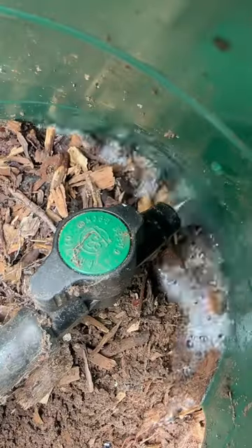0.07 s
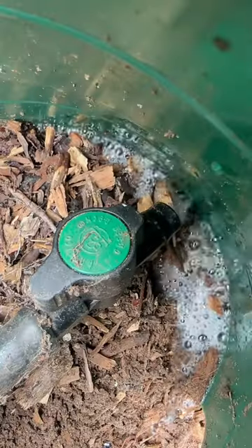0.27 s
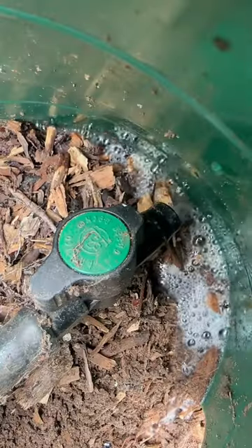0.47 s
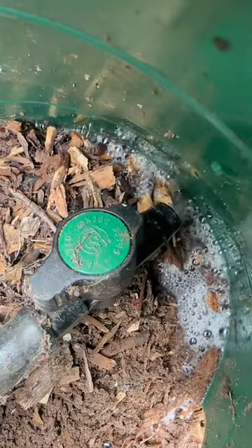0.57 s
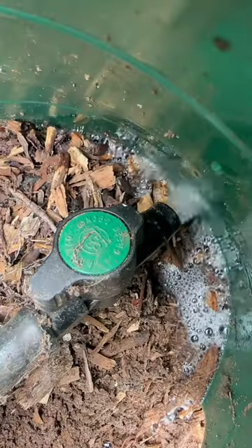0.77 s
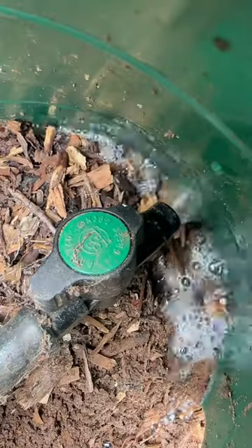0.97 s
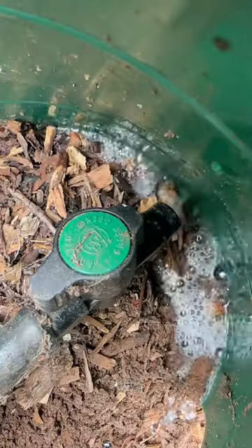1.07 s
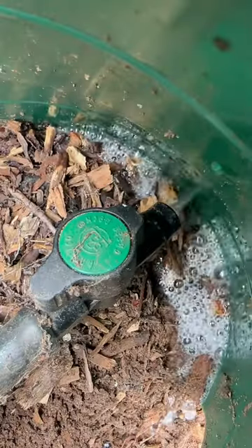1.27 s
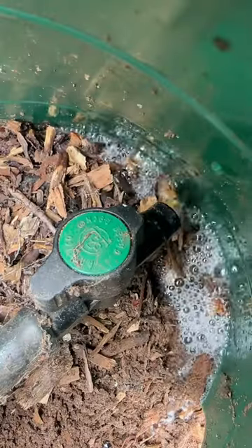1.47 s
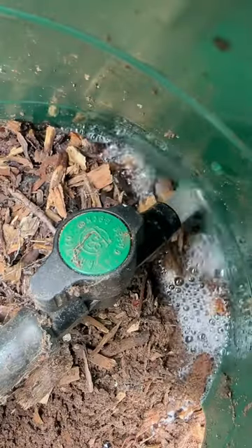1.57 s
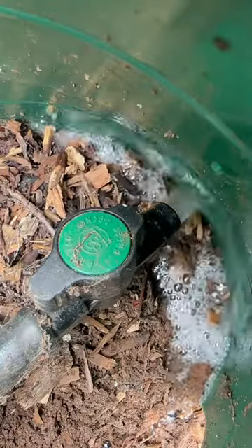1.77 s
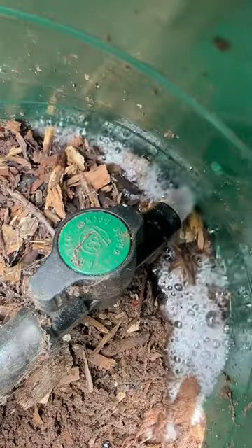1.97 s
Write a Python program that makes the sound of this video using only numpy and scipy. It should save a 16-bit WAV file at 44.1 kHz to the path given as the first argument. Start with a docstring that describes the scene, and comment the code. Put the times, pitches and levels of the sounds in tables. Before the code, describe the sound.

Soapy water gurgles out of a drain pipe into a plastic basin of mulch. Irregular surges bring hollow glugs, wet slaps and bursts of pattering spray, with softer bubbling between them, close to the microphone and slightly left.

```python
"""Drain pipe into a mulch basin

Soapy water surges from a drain pipe into a plastic basin of mulch, close to a stereo microphone pair.
Foam fizzes faintly, spray hisses and patters, and churning water sets the air in the pipe humming.
In front, slugs of water slap out and large air pockets glug, most of them rising in pitch."""
import sys
import numpy as np
from scipy import signal
from scipy.fft import rfft, irfft
from scipy.io import wavfile
from scipy.ndimage import uniform_filter1d, minimum_filter1d

SR = 44100
rng = np.random.default_rng(int(sys.argv[2]) if len(sys.argv) > 2 else 0)


def file_out(sig):
    """Save sig as 16-bit WAV at sys.argv[1]."""
    # one column per channel
    cols = np.atleast_2d(sig).T
    # limit, then scale
    lim = np.clip(cols, -1, 1)
    pcm = np.round(lim * 32767).astype(np.int16)
    wavfile.write(sys.argv[1], SR, pcm)


N = 89390

# Spectrum of the foam's fizz: f/Hz, relative level/dB
FOAM_SPECTRUM = [(590, -42), (1000, -12), (1500, -23), (8480, -13), (11200, -25), (13700, -4), (16300, -29)]
# Surges of spray: t/s, level/dB
SPRAY_LEVELS = [(0, -30.5), (.07, -45.5), (.135, -44.5), (.15, -60.5), (.53, -58), (.71, -48.5),
                (.73, -36.5), (.83, -30.5), (.875, -32.5), (.91, -45.5), (1.0, -46), (1.02, -59.5),
                (1.27, -57.5), (1.35, -44.5), (1.5, -49), (1.54, -37.5), (1.63, -35.5), (1.73, -40),
                (1.84, -45.5), (1.9, -56.5), (1.95, -62), (2.03, -52.5)]
# Spectrum of the spray: f/Hz, relative level/dB
SPRAY_SPECTRUM = [(350, -32), (600, -25.5), (896, -3), (1340, -11.5), (1890, -5.5), (2860, -15),
                  (8510, -9.5), (11500, -16.5), (14200, -15), (16300, -7)]
# Modes of the air in the pipe, low to high: f/Hz, nominal width/Hz, relative level/dB
PIPE_MODES = [(211, 54.6, 1.5), (278.6, 19, -7.5), (411.7, 43, 0.5), (684, 31.5, -12), (1030, 310, 6.5),
              (1510, 49, 8), (1813, 85, -3.5), (2255, 41, -6), (3020, 50, -3.5), (3507, 65, 1),
              (4107, 140, 3)]
# Surges in the pipe: t/s, hum level/dB, rumble level/dB, level of the sputter at the mouth/dB
CHURN_LEVELS = [(0, -17.5, -23, -43), (.03, -28, -38, -42), (.1, -37, -37.5, -67), (.2, -28, -26, -60),
                (.46, -39, -40.5, -62.5), (.6, -32.5, -50, -59), (.635, -19, -21, -64),
                (.72, -27, -61, -41), (.79, -33.5, -69, -68), (.86, -20, -30, -29.5),
                (.93, -29.5, -33, -98), (1.08, -31.5, -37.5, -48), (1.19, -48, -41, -59.5),
                (1.3, -34.5, -43.5, -52.5), (1.37, -23, -19.5, -42), (1.45, -25.5, -52, -54),
                (1.62, -33, -40.5, -47), (1.84, -43, -41, -65), (1.9, -31.5, -28.5, -51),
                (2.03, -33.5, -29, -93)]
# Spectrum of the rumble: f/Hz, relative level/dB
RUMBLE_SPECTRUM = [(25, -24), (54, 12), (113, 1.5), (160, 6), (210, -22.5)]
# Slugs and drops striking: t/s, relative crack level/dB, relative thump level/dB, crack t60/s, crack f/Hz
STRIKES = [(0.0357, -14, -17, 0.013, 3060), (.068, -24, -27.5, 0.036, 3270),
           (0.0771, -13, -23.5, 0.024, 3460), (0.087, -18.5, -22.5, 0.06, 2800),
           (0.119, -24, -61.5, 0.02, 4220), (0.17, -21, -22, 0.022, 4700), (0.25, -35, -34, 0.046, 3540),
           (0.4412, -38, -51, 0.022, 3480), (0.4908, -63, -40, 0.052, 1520),
           (0.5402, -35, -25, 0.073, 4170), (0.6206, -27, -24, 0.04, 1600),
           (0.629, -21.5, -36, 0.026, 4100), (0.6469, -42, -23.5, 0.038, 4100),
           (0.699, -16, -40, 0.014, 8700), (0.7209, -24, -29.5, 0.064, 8400), (0.78, -18, -28, 0.03, 9050),
           (0.799, -15, -33, 0.034, 6660), (0.838, -12.5, -15.5, 0.049, 5700),
           (0.8713, -12.5, -22.5, 0.023, 5110), (0.8941, -11.5, -27, 0.019, 8500),
           (0.9152, -23, -67, 0.013, 4340), (0.953, -21, -21, 0.05, 2280), (0.9863, -26, -23, 0.019, 6660),
           (1.0305, -19, -21, 0.016, 4450), (1.2269, -61, -40, 0.06, 3540), (1.2903, -32, -36, 0.044, 3950),
           (1.351, -26, -27, 0.034, 4140), (1.3755, -24, -18.5, 0.043, 4100),
           (1.3857, -32, -23.5, 0.032, 4000), (1.393, -36, -20, 0.022, 4040),
           (1.4192, -32, -15.5, 0.016, 4130), (1.4763, -24, -27.5, 0.035, 4270),
           (1.515, -23.5, -28.5, 0.018, 8270), (1.5311, -18.5, -60, 0.023, 5000),
           (1.5686, -13, -64, 0.015, 6100), (1.6025, -17, -27, 0.023, 1810),
           (1.6451, -19, -30, 0.028, 6860), (1.676, -13.5, -52, 0.015, 7100),
           (1.7172, -15.5, -38.5, 0.023, 7940), (1.8613, -23, -74, 0.07, 2300),
           (1.9196, -9, -14.5, 0.018, 4400), (1.9849, -31, -37, 0.025, 3850),
           (2.0208, -9.5, -16.5, 0.01, 2620)]
# Spectrum of a strike's crack: f/Hz, relative level/dB
CRACK_SPECTRUM = [(880, -58), (1500, -4.5), (3140, -6.5), (4150, -12.5), (7560, -10), (8520, -6),
                  (11200, -18), (13600, -7), (16300, -17.5)]
# Spectrum of a strike's thump: f/Hz, relative level/dB
THUMP_SPECTRUM = [(100, 15.5), (400, 21.5), (900, 2.5), (1800, -4), (3000, -18), (4200, -10.5), (5200, -56)]
# Large air pockets: t/s, length/s, start f/Hz, end f/Hz, peak level before wobble/dB
AIR_POCKETS = [(.002, 0.013, 341, 364, -8), (0.009, 0.052, 367, 440, -22), (0.068, 0.047, 1775, 1834, -30),
               (0.093, 0.006, 1270, 1350, -34), (0.083, 0.029, 211, 305, -17),
               (0.171, 0.094, 404, 409, -20.5), (.185, 0.0097, 157, 203, -13),
               (0.226, 0.053, 393.5, 427, -23.5), (0.228, 0.025, 628, 677, -26),
               (0.286, 0.062, 440, 474, -26), (0.305, 0.03, 570, 703, -32), (0.371, .07, 192, 266, -30),
               (.443, 0.017, 650, 687, -31), (0.451, 0.037, 181, 194, -28), (0.458, 0.1, 404, 490, -31),
               (.492, 0.026, 230, 199, -20.5), (0.546, 0.068, 419, 410, -23.5),
               (0.547, 0.071, 225, 241, -16.5), (.619, 0.043, 297, 525, -13.5),
               (.62, 0.026, 1560, 1600, -31), (0.641, 0.047, 376, 440, -10),
               (0.648, 0.021, 4000, 4150, -42.5), (0.652, 0.043, 1380, 1820, -41),
               (0.674, 0.023, 485, 488, -8), (0.678, 0.032, 768, 1123, -23.5),
               (0.681, 0.014, 1790, 1910, -28), (0.688, 0.015, 346, 490, -3),
               (0.712, 0.017, 830, 1100, -25.5), (0.727, 0.0081, 324, 332, -8),
               (0.737, 0.013, 228, 288, -13.5), (.841, 0.037, 324, 409, -15), (.842, 0.013, 208, 322, -6.5),
               (.8415, 0.0035, 770, 1080, -14), (.843, 0.005, 1780, 1860, -19.5),
               (0.853, 0.0065, 806, 1200, -16.5), (0.867, 0.02, 231, 305, -14.5),
               (.872, 0.007, 1800, 1880, -24.5), (.895, 0.0089, 479, 470, -19),
               (0.952, 0.089, 634, 637, -30.5), (.955, 0.0097, 424, 436, -16.5),
               (0.999, 0.1, 435, 434.4, -26.5), (1.029, 0.027, 1390, 1496, -41),
               (1.14, 0.091, 690, 710, -43), (1.228, 0.015, 502, 510, -26), (1.286, 0.04, 678, 790, -35),
               (1.296, 0.08, 352.6, 416, -30), (1.347, 0.0099, 283, 540, -6.5),
               (1.346, 0.0089, 825, 1080, -27.5), (1.359, 0.0079, 755, 1070, -31),
               (1.362, 0.0085, 239, 380, -7.5), (1.375, 0.047, 1430, 1576, -30),
               (1.387, 0.017, 2280, 2330, -36), (1.374, 0.042, 315, 363, -8.5),
               (1.388, 0.0087, 449, 586, -7), (1.389, 0.053, 227, 266, -11.5), (1.396, 0.048, 365, 385, -8),
               (1.418, 0.039, 430, 450, -8), (1.419, 0.017, 1770, 1920, -26.5),
               (1.42, 0.027, 1130, 1620, -23), (1.447, 0.037, 1320, 1090, -33),
               (1.489, 0.0077, 300, 358, -13.5), (1.503, 0.015, 400, 446, -20),
               (1.618, 0.048, 379, 386, -27.5), (1.803, 0.018, 390, 361, -24),
               (1.888, 0.035, 286, 347, -18.5), (1.918, 0.03, 369, 386, -15.5),
               (1.926, 0.0099, 1210, 1280, -26.5), (1.979, 0.013, 124, 138, -21)]
# Likeness of the splash at the two microphones: f/Hz, correlation
MIC_LIKENESS = [(500, .985), (1400, .88), (2800, .7), (5600, .68), (16000, .8)]
# Left microphone over right: f/Hz, level/dB
LEFT_LEVEL = [(60, 0.5), (380, 1), (700, 8), (1290, 4), (2380, 7), (4400, 7.5), (8120, 3), (15000, -3.5)]
# Left microphone ahead of right: f/Hz, phase/rad
LEFT_PHASE = [(0, 0), (690, 0.43), (1550, -1), (2330, 1.2), (2840, 1.5), (3880, 0.53), (5340, 1.35),
              (7490, 1.5), (8870, 0), (10200, -3.5), (12200, -17.5), (13700, -4.5), (16200, -6.5)]

FOAM_DB, HISS_FLICKER_DB = -73.5, 3.5
DROPS_PER_S, DROP_SPREAD_DB, DROP_SHARE = 3000, 4.2, .45
PLOPS_PER_S, PLOP_SPREAD_DB, TURBULENCE = 230, 6, 0.86
CRACK_RISE_S, CRACK_CREST_DB, CRACK_PEAK_DB, CRACK_PEAK_OCT = 0.0014, 8, 10, 0.32
THUMP_RISE_S, THUMP_LIFT_DB, THUMP_STRETCH, PIPE_RING_DB = 0.00056, 5.5, 1.79, -16
GLUG_RISE_S, GLUG_WOBBLE_DB, JITTER_TURNS_PER_KHZ = .0008, 3.0, .06
GLUG_SKEW = 0.48  # below 1 the swell peaks early
BASS_CUT_HZ, TREBLE_CUT_HZ, CEILING = 58, 16000, .9


def gain_of(db):
    return 10 ** (np.asarray(db) / 20)


def unit_rms(x):
    return x / np.sqrt(np.mean(x ** 2) + 1e-20)


def at_hz(table, hz):
    f, value = np.transpose(table)
    return np.interp(np.log(hz + 1), np.log(f + 1), value)


def envelope(table, column):
    """One dB column of a table as gain per sample."""
    rows = np.array(table)
    return gain_of(np.interp(np.arange(N) / SR, rows[:, 0], rows[:, column]))


def add(mix, start_s, sound):
    part = mix[round(start_s * SR):][:len(sound)]
    part += sound[:len(part)]


def colour(x, spectrum):
    """Filters by a spectrum, rolling off past its ends; rms 1."""
    hz = np.fft.rfftfreq(len(x), 1 / SR)
    band = np.clip(hz / spectrum[0][0], 0, 1) ** 4 * np.clip(spectrum[-1][0] / (hz + 1), 0, 1) ** 4
    return unit_rms(irfft(rfft(x) * gain_of(at_hz(spectrum, hz)) * band, len(x)))


def ring(x, hz, width):
    """One resonance of peak gain 1."""
    return signal.lfilter(*signal.iirpeak(hz, hz / width, SR), x)


def clicks(per_s, spread_db):
    """Sparse impulses of random sign, a few large."""
    size = gain_of(spread_db * np.minimum(rng.exponential(1, N), 4)) * rng.choice([-1., 1.], N)
    return size * (rng.random(N) < per_s / SR)


def flutter(first, second):
    """Noise smoothed over two spans of samples; rms 1."""
    return unit_rms(uniform_filter1d(uniform_filter1d(rng.standard_normal(N), first), second))


def foam():
    """Soap foam fizzes softly and steadily behind everything."""
    return gain_of(FOAM_DB) * colour(rng.standard_normal(N), FOAM_SPECTRUM)


def spray():
    """Droplets patter as short rising grains of many pitches over a flickering hiss."""
    t, drops = np.arange(300) / SR, np.zeros(N)
    pitches = np.geomspace(900, 15000, num=24)
    for hz in pitches:
        grain = np.sin(2 * np.pi * hz * t * (1 + 40 * t)) * np.exp(-t * hz / 2.6)
        hits = clicks(DROPS_PER_S / len(pitches), DROP_SPREAD_DB)
        drops += signal.oaconvolve(hits, grain * np.sqrt(hz))[:N]
    treble_lift = np.sqrt(np.clip(np.fft.rfftfreq(N, 1 / SR) / 900, 1, 17))
    drops = unit_rms(irfft(rfft(drops) * treble_lift, N))
    flicker = gain_of(HISS_FLICKER_DB * flutter(300, 200))
    hiss = unit_rms(flicker * rng.standard_normal(N))
    mix = DROP_SHARE * drops + (1 - DROP_SHARE) * hiss
    return envelope(SPRAY_LEVELS, column=1) * colour(mix, SPRAY_SPECTRUM)


def pipe(drive, modes):
    """The air column rings at its modes."""
    return unit_rms(sum(gain_of(db) * np.sqrt(50 / width) * ring(ring(drive, hz, 2 * width), hz, 2 * width)
                        for hz, width, db in modes))


def churn():
    """Small plops and turbulence ring the air in the pipe; a lumpy rumble lies below."""
    plops = unit_rms(clicks(PLOPS_PER_S, PLOP_SPREAD_DB))
    drive = plops + TURBULENCE * rng.standard_normal(N)
    hum = envelope(CHURN_LEVELS, column=1) * pipe(drive, PIPE_MODES[:4])
    rumble = envelope(CHURN_LEVELS, column=2) * colour(rng.standard_normal(N), RUMBLE_SPECTRUM)
    sputter = envelope(CHURN_LEVELS, column=3) * pipe(drive, PIPE_MODES[4:])
    return hum + sputter + rumble


def slaps():
    """Each slug strikes with a bright crack and a longer, duller thump; both ring the upper pipe modes."""
    strikes, t = np.zeros(N), np.arange(4000) / SR
    hz = np.fft.rfftfreq(len(t), 1 / SR) + 1
    for start_s, crack_db, thump_db, t60, crack_hz in STRIKES:
        crack_noise, thump_noise = rng.standard_normal((2, len(t)))
        peak = gain_of(CRACK_PEAK_DB * np.exp(-(np.log2(hz / crack_hz) / CRACK_PEAK_OCT) ** 2))
        crack = colour(irfft(rfft(crack_noise) * peak), CRACK_SPECTRUM)
        crack *= gain_of(crack_db - CRACK_CREST_DB - 60 * t / t60)
        thump = colour(thump_noise, THUMP_SPECTRUM)
        thump *= gain_of(thump_db + THUMP_LIFT_DB - 60 * t / (t60 * THUMP_STRETCH))
        add(strikes, start_s, crack * np.minimum(t / CRACK_RISE_S, 1))
        add(strikes, start_s, thump * np.minimum(t / THUMP_RISE_S, 1))
    ringing = sum(ring(strikes, f, width) * np.sqrt(f / width) for f, width, _ in PIPE_MODES[3:])
    return strikes + gain_of(PIPE_RING_DB) * ringing


def splash():
    """Water landing in the basin: slaps and spray over the foam."""
    return slaps() + spray() + foam()


def glugs():
    """Air pockets ring as near sines, most climbing as they near the surface; turbulence wobbles them."""
    out = np.zeros(N)
    wobble, jitter = flutter(120, 80), flutter(120, 80)
    for start_s, length_s, start_hz, end_hz, db in AIR_POCKETS:
        progress = np.arange(round(length_s * SR)) / (length_s * SR)
        turns = rng.random() + length_s * (start_hz * progress + (end_hz - start_hz) * progress ** 2 / 2)
        # small, high pockets waver most
        turns += JITTER_TURNS_PER_KHZ * start_hz / 1000 * jitter[round(start_s * SR):][:len(progress)]
        swell = np.sin(np.pi * progress ** GLUG_SKEW) * np.minimum(progress * length_s / GLUG_RISE_S, 1)
        add(out, start_s, gain_of(db) * swell * np.sin(2 * np.pi * turns))
    return out * gain_of(GLUG_WOBBLE_DB * np.tanh(wobble))


def scene():
    """The water is close and leans left; part of the splash reaches each microphone differently."""
    hz = np.fft.rfftfreq(N, 1 / SR)
    likeness = at_hz(MIC_LIKENESS, hz)
    mid = np.sqrt((1 + likeness) / 2) * rfft(glugs() + churn() + splash())
    side = np.sqrt((1 - likeness) / 2) * rfft(splash())
    lean = gain_of(at_hz(LEFT_LEVEL, hz) / 2) * np.exp(.5j * at_hz(LEFT_PHASE, hz))
    return irfft(np.array([(mid + side) * lean, (mid - side) / lean]), N)


def record(dry):
    """Behind the microphones: a bass cut, a smooth limiter on the loudest peaks, then a treble cut."""
    cut = signal.sosfilt(signal.butter(3, BASS_CUT_HZ, "high", fs=SR, output="sos"), dry)
    gain = minimum_filter1d(CEILING / np.maximum(abs(cut).max(0), CEILING), size=401)
    limited = cut * uniform_filter1d(uniform_filter1d(gain, size=200), size=200)
    lowpass = signal.firwin(511, TREBLE_CUT_HZ, window=("kaiser", 9), fs=SR)
    return signal.oaconvolve(limited, lowpass[None], "same")


dry = scene()
out = record(dry)
file_out(out)
```